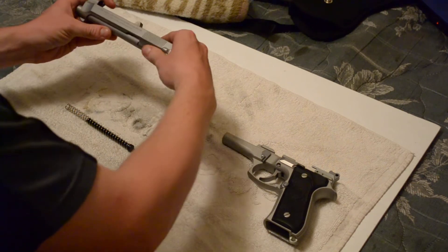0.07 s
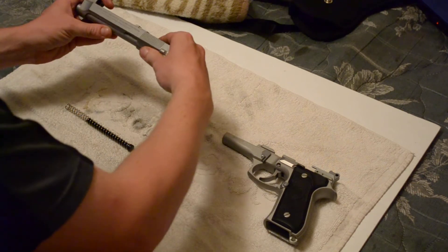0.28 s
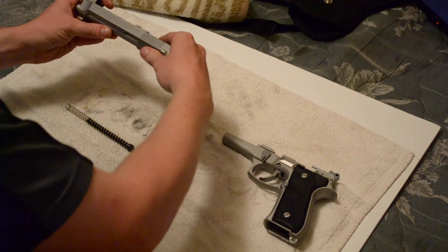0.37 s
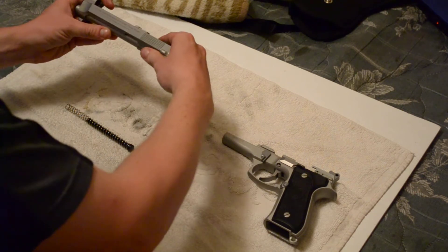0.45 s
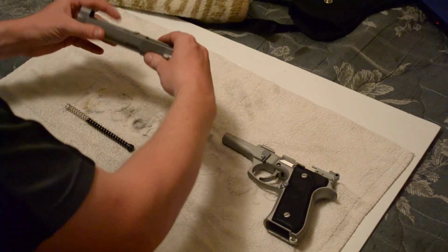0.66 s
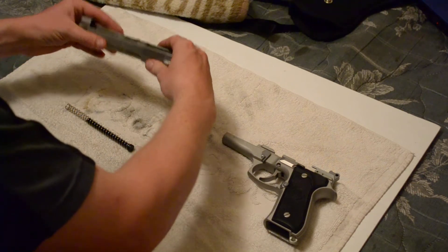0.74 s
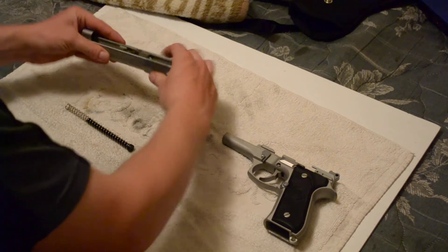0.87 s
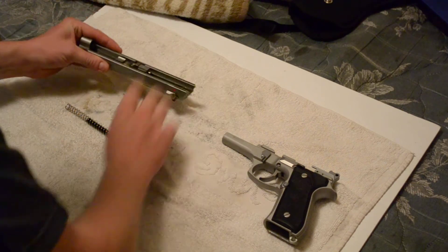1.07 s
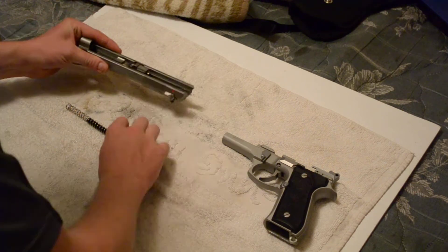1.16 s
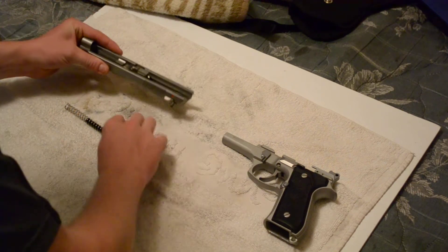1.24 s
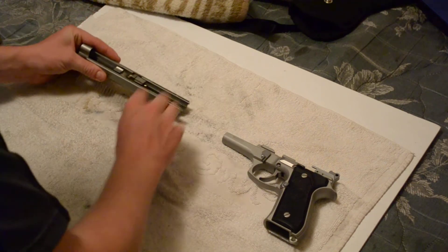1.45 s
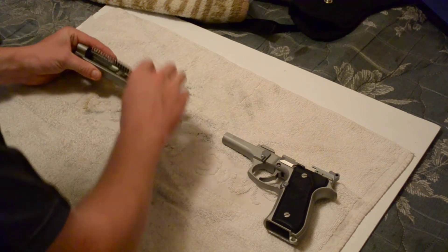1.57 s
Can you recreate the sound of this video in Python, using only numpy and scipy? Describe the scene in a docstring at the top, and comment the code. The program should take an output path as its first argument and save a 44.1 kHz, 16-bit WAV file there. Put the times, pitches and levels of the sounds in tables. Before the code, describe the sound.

A bright metallic clack of pistol parts in a quiet room, then two very faint ticks

```python
"""The loose barrel inside a steel pistol slide slips, ticks and knocks home as hands turn the slide over,
then shifts twice more, faintly. Clicks and runs of tiny grains set the modes of the steel ringing.
A quiet soft-furnished room answers with a faint tail of decaying noise. Behind lie a steady hiss
(filtered noise), flickering narrow whines (resonated noise) and a low wavering hum (a sine)."""
import sys
import numpy as np
from scipy import signal
from scipy.fft import rfft, irfft
from scipy.io import wavfile

SR = 44100
rng = np.random.default_rng(int(sys.argv[2]) if len(sys.argv) > 2 else 0)


def unload_audio(sound):
    """Save the sound as a 16-bit wav file, at the path given as the first command line argument."""
    columns = np.transpose(np.atleast_2d(sound))
    # keep every value between -1 and 1, then stretch to whole-number steps
    steps = np.round(np.clip(columns, -1, 1) * 32767)
    wavfile.write(sys.argv[1], SR, steps.astype(np.int16))


N = 72765

# Spectrum of the hiss before overall scaling: (f/Hz, relative spectral level/dB)
HISS_SPECTRUM = [(30, -30), (77, -14), (157, -8.5), (330, -3), (800, -3.5), (1500, -6.5), (2500, -10),
                 (4200, -16), (7000, -24), (7900, -31.5), (8500, -28.5), (10000, -31), (11500, -28.5)]
# Narrow whines: (f/Hz, width/Hz, level before flicker/dB)
WHINE_BANDS = [(2182, 60, -79.5), (2984, 96.5, -71), (3675, 140, -79), (4570, 43, -87)]
# Steel striking steel; the spot struck favours modes near one pitch:
# (t/s, drive level/dB, tilt/(dB per octave), favoured f/Hz, boost/dB, boost width/octaves)
KNOCKS = [(.2118, -46.5, 5.5, 10200, 12, .15), (.2327, -23.5, -1, 4500, 5.5, .15),
          (.2352, -33, 2, 9200, 13, 0.11), (0.4454, -69, -14.5, 4581, 24, .015),
          (.4485, -65, -8, 2035, 17, .05), (.5315, -76, 3, 10000, 14.5, .025)]
# The barrel slipping along the slide; the drive runs from 1.5 swells to half a swell below nominal:
# (start t/s, length/s, nominal drive level/dB, swell/dB, tilt/(dB per octave),
#  favoured f/Hz, boost/dB, boost width/octaves)
SLIPS = [(0.199, .009, -62.5, 5.5, -4.5, 4581, 3.5, .05), (0.21, 0.012, -51.5, 2, -5.5, 4581, 11, .05),
         (0.433, 0.012, -74, -1, -9.5, 2584, 10, .05)]
# Modes of slide and barrel: (f/Hz, relative level/dB, t60/s)
STEEL_MODES = [(1736, -11.5, 0.047), (2035, -11, 0.051), (2584, -9.5, 0.044), (2990, -7.5, 0.011),
               (3900, -9, 0.017), (4158, -4.5, 0.023), (4500, 4, 0.0088), (4581, -4, 0.057),
               (4730, -5.5, 0.024), (5240, -17, 0.19), (5000, -1, 0.0148), (5900, -9, .015),
               (6312, -13, 0.16), (6376, -8, 0.056), (6503, -5, 0.037), (7050, -4, 0.038),
               (7480, -17.5, 0.045), (8680, -4.5, 0.034), (8990, -41, .22), (9150, -7, 0.016),
               (10000, -9.5, 0.02), (10300, -20, 0.077), (10770, -14, 0.018), (11300, -24, .05),
               (12700, 7.5, 0.093), (13300, -22, 0.056)]

HUM_HZ, HUM_DB, HUM_WAVER_DB, HUM_WAVER_RATE_HZ = 51.6, -79.5, -1.45, 6
HISS_DB = -63.5
FLICKER_DB, FLICKER_RATE_HZ = 3, 66.4
ROOM_DB, ROOM_T60_S, ROOM_BUILD_S, ROOM_LENGTH_S = -30, 0.2, 0.0083, 0.36
SLIP_GRAINS_PER_S, GRAIN_SPREAD_DB = 3400, 1
MODE_CHANCE_DB, TILT_ABOUT_HZ = 1.0, 4500
CRACK_DB, CRACK_T60_S, CRACK_LENGTH_S = -9, 0.028, 0.03
LOW_EDGE_HZ = 1455
ROLL_OFF_HZ, ROLL_OFF_DB = 12020, 34
CUTOFF_HZ, CUTOFF_DB = 13600, 70


def amp(db):
    """Amplitude ratio: 20 dB is a factor of ten."""
    return 10 ** (np.asarray(db) / 20)


def rms_one(x):
    """Normalisation to unit root mean square."""
    return x / np.sqrt(np.mean(x ** 2) + 1e-20)


def drift(rate_hz):
    """Random fluctuation: noise through two equal low-pass poles, scaled to unit rms."""
    r = np.exp(-2 * np.pi * rate_hz / SR)
    noise = rng.standard_normal(N + SR)
    smooth = signal.lfilter([1], [1, -2 * r, r * r], noise)
    return rms_one(smooth[SR:])  # the first second lets the filter settle


def ring(force, hz, t60):
    """Damped resonance: a unit click excites a decaying sine of initial height 1."""
    r = amp(-60 / (t60 * SR))
    w = 2 * np.pi * hz / SR
    return signal.lfilter([0, np.sin(w)], [1, -2 * r * np.cos(w), r * r], force + 1e-18)


def dying_noise(t60, length):
    """Exponential decay: noise falling at 60 dB per t60."""
    t = np.arange(int(length * SR)) / SR
    return rng.standard_normal(len(t)) * amp(-60 * t / t60)


def hum():
    """Amplitude modulation: a low sine whose level wavers at random."""
    t = np.arange(N) / SR
    level = amp(HUM_DB + HUM_WAVER_DB * drift(HUM_WAVER_RATE_HZ))
    return np.sqrt(2) * level * np.sin(2 * np.pi * HUM_HZ * t)


def hiss():
    """Spectral shaping: steady white noise weighted in frequency."""
    hz, db = np.transpose(HISS_SPECTRUM)
    log_hz = np.log(np.arange(N // 2 + 1) * SR / N + 1)
    weight = amp(np.interp(log_hz, np.log(hz), db))
    spectrum = rfft(rng.standard_normal(N)) * weight
    return amp(HISS_DB) * rms_one(irfft(spectrum, N))


def whines():
    """Resonant filtering: noise passes two equal resonances in series; all bands flicker together."""
    total = 0
    for hz, width, db in WHINE_BANDS:
        # each resonance is wider than the band, since two in series narrow it
        t60 = np.log(1000) / (np.pi * width * 1.5)
        once = ring(rng.standard_normal(N), hz, t60)
        twice = ring(once, hz, t60)
        total = total + amp(db) * rms_one(twice)
    return total * amp(FLICKER_DB * drift(FLICKER_RATE_HZ))


def room(x):
    """Reverberation: convolution with noise that builds up briefly while decaying exponentially."""
    tail = dying_noise(ROOM_T60_S, ROOM_LENGTH_S)
    build = np.minimum(np.arange(len(tail)) / SR / ROOM_BUILD_S, 1)
    return amp(ROOM_DB) * signal.fftconvolve(x, tail * build)[:N]


def colour_db(hz, tilt, favoured_hz, boost_db, octaves):
    """Modal excitation: the drive at hz follows a spectral tilt plus a boost near one pitch."""
    distance = np.log2(hz / favoured_hz) / octaves
    return tilt * np.log2(hz / TILT_ABOUT_HZ) + boost_db * np.exp(-distance ** 2)


def knock(start, db):
    """Impulsive contact: a single click of force."""
    return amp(db) * (np.arange(N) == int(start * SR))


def slip(start, length, db, swell_db):
    """Frictional contact: randomly timed grains of either sign, their level sloping with the swell."""
    part = (np.arange(N) / SR - start) / length
    grains = (rng.random(N) < SLIP_GRAINS_PER_S / SR) * rng.choice([-1, 1], N)
    spread_db = GRAIN_SPREAD_DB * np.minimum(rng.exponential(1, N), 3)
    slope_db = swell_db * (np.clip(part, 0, 1) - 1.5)
    sizes = amp(spread_db + db + slope_db)
    return grains * sizes * (part >= 0) * (part < 1)


def contacts():
    """Excitation: each knock and slip as a pair (force, colour)."""
    knocks = [(knock(start, db), colour) for start, db, *colour in KNOCKS]
    slips = [(slip(start, length, db, swell_db), colour)
             for start, length, db, swell_db, *colour in SLIPS]
    return knocks + slips


def slide():
    """Modal superposition: each contact drives every mode by a chance strength and adds a short crack."""
    touches = contacts()
    chance = rng.standard_normal((len(touches), len(STEEL_MODES)))
    ringing = 0
    for k, (hz, db, t60) in enumerate(STEEL_MODES):
        drive = 0
        for j, (force, colour) in enumerate(touches):
            drive = drive + force * amp(db + colour_db(hz, *colour) + MODE_CHANCE_DB * chance[j, k])
        ringing = ringing + (-1) ** k * ring(drive, hz, t60)  # neighbours alternate in sign
    all_forces = sum(force for force, _ in touches)
    crack = signal.fftconvolve(all_forces, dying_noise(CRACK_T60_S, CRACK_LENGTH_S))[:N]
    # small parts radiate little bass
    high_pass = signal.butter(12, LOW_EDGE_HZ, "high", fs=SR, output="sos")
    return signal.sosfilt(high_pass, ringing + amp(CRACK_DB) * crack)


def scene():
    """Linear superposition: background, steel and its reverberation add."""
    steel = slide()
    background = hum() + hiss() + whines()
    return (background + room(steel) + steel)[None]


def record(dry):
    """Low-pass filtering: the microphone rolls off at the top, then a steeper filter cuts the top."""
    roll_off = signal.cheby2(6, ROLL_OFF_DB, ROLL_OFF_HZ, fs=SR, output="sos")
    cut = signal.cheby2(12, CUTOFF_DB, CUTOFF_HZ, fs=SR, output="sos")
    return signal.sosfilt(cut, signal.sosfilt(roll_off, dry))


dry = scene()
out = record(dry)
unload_audio(out)
```